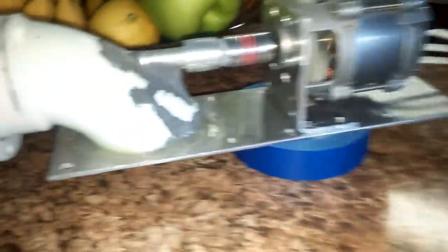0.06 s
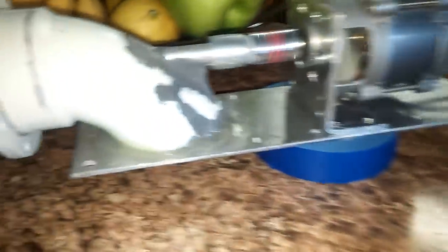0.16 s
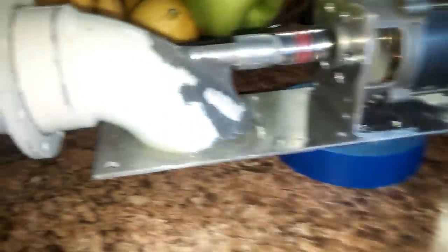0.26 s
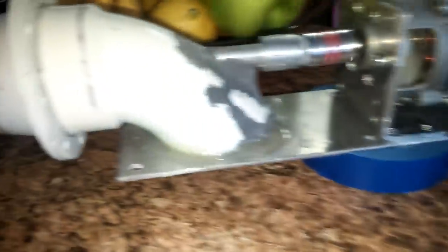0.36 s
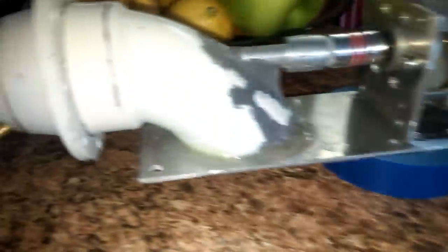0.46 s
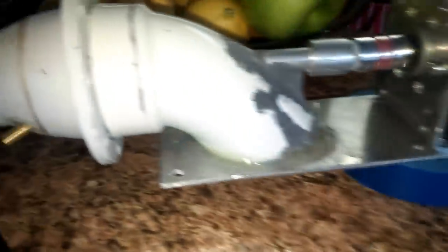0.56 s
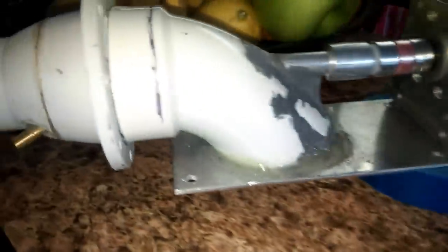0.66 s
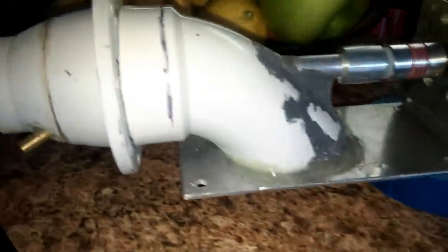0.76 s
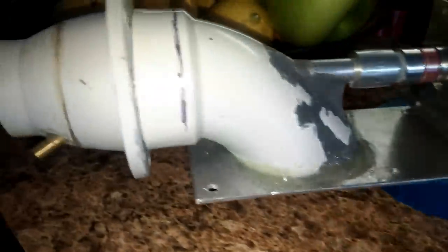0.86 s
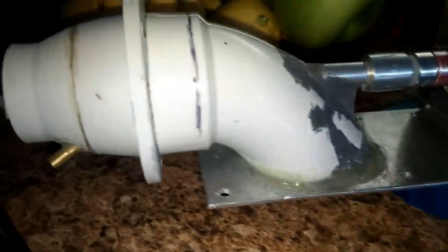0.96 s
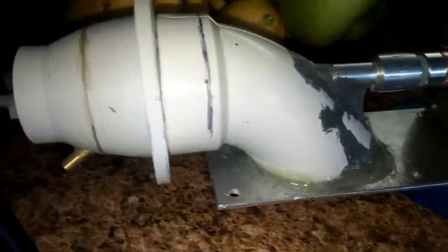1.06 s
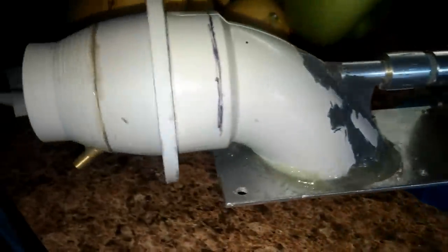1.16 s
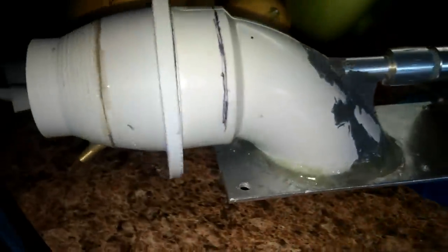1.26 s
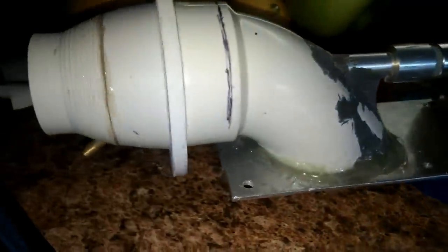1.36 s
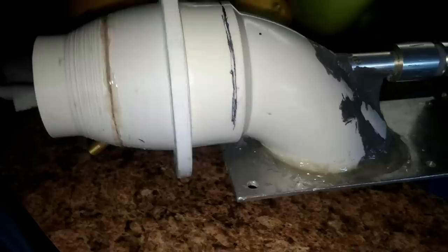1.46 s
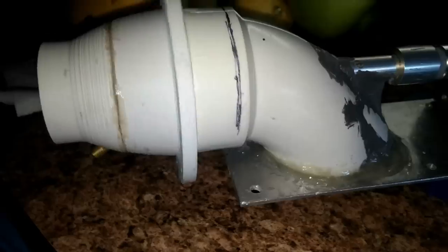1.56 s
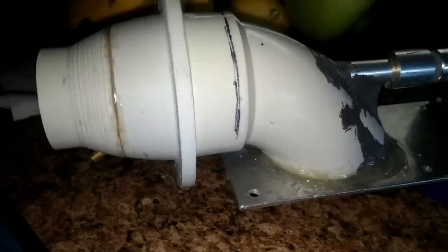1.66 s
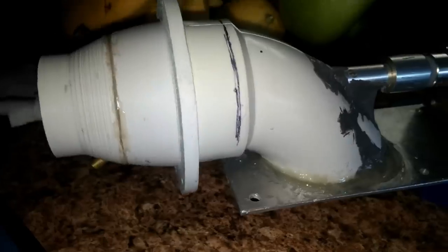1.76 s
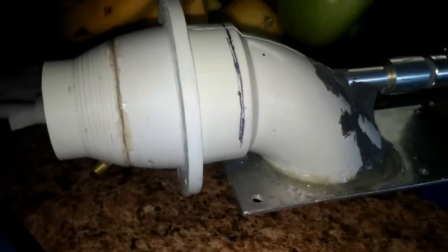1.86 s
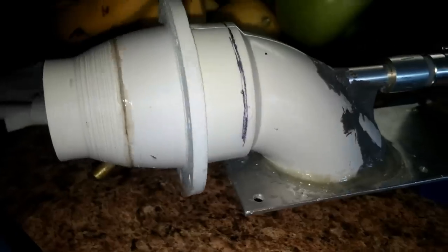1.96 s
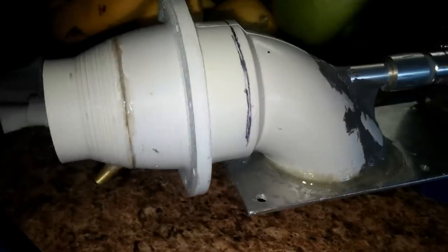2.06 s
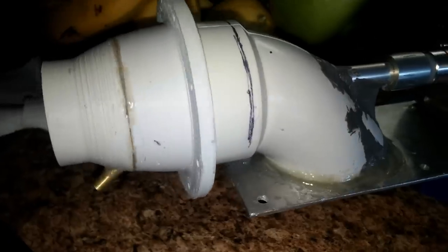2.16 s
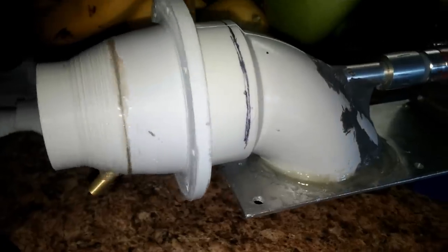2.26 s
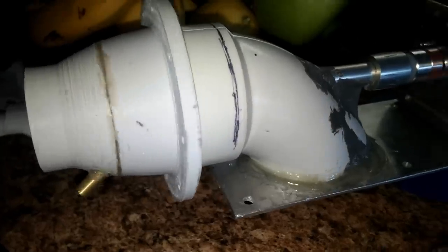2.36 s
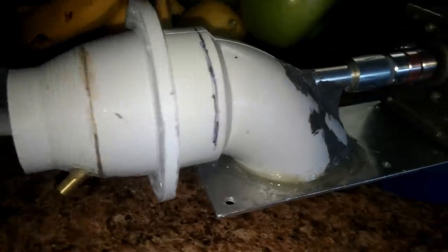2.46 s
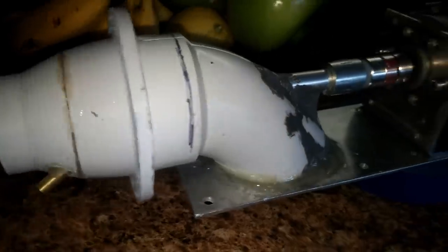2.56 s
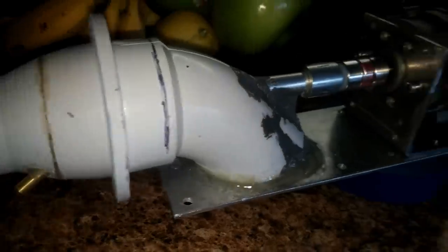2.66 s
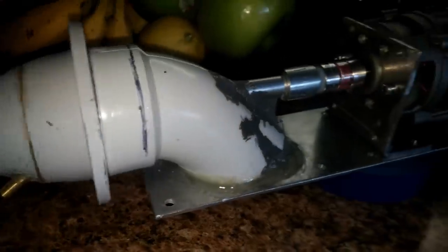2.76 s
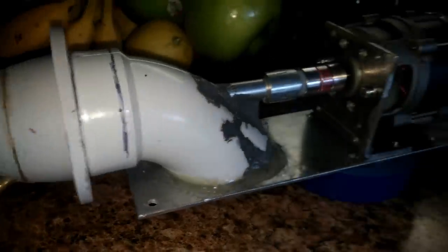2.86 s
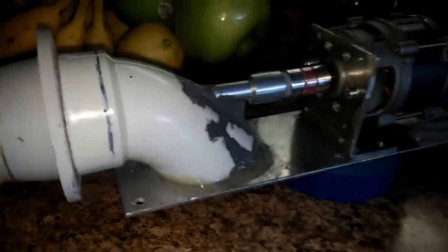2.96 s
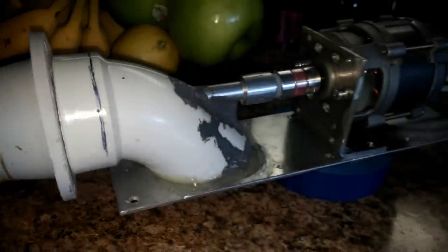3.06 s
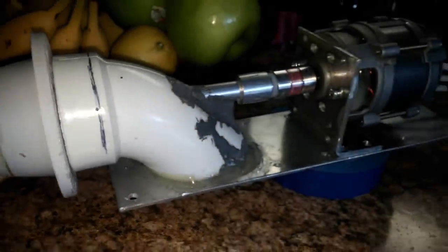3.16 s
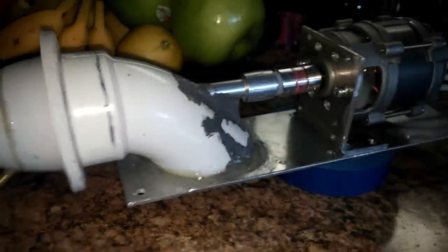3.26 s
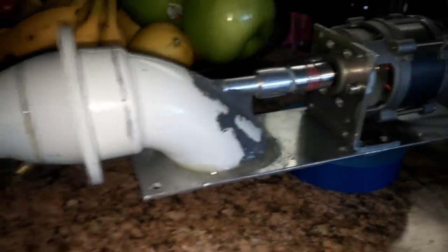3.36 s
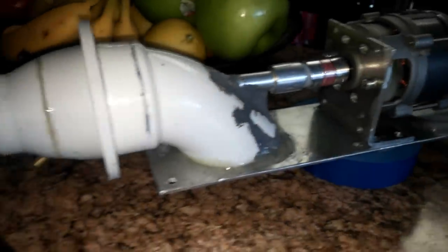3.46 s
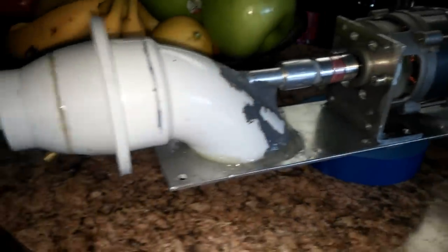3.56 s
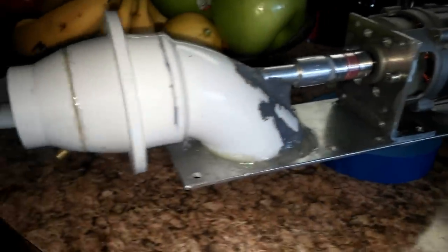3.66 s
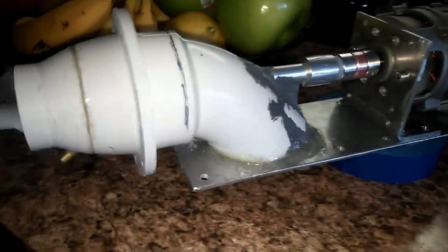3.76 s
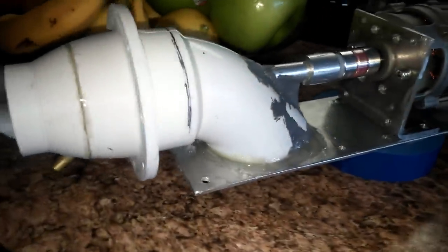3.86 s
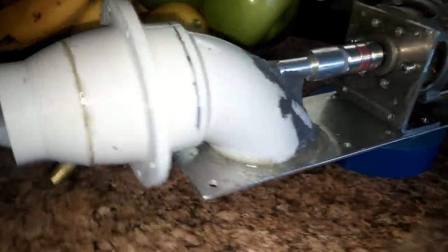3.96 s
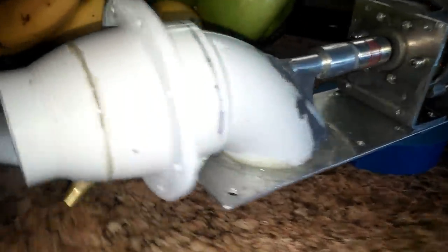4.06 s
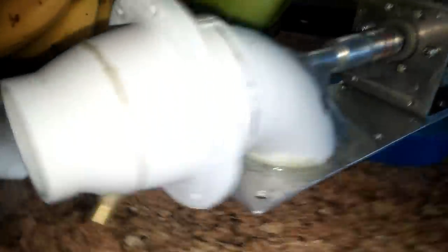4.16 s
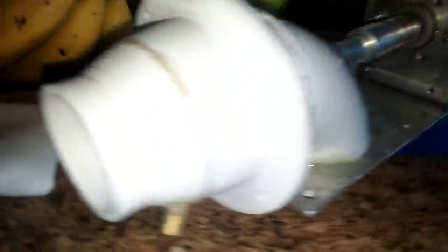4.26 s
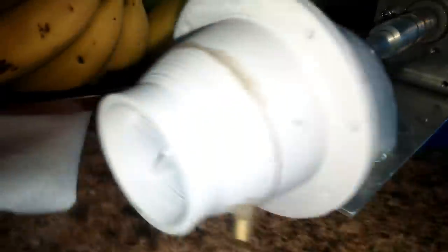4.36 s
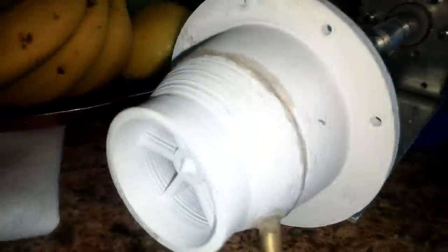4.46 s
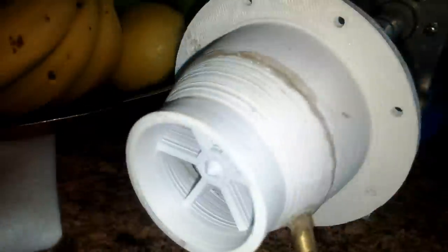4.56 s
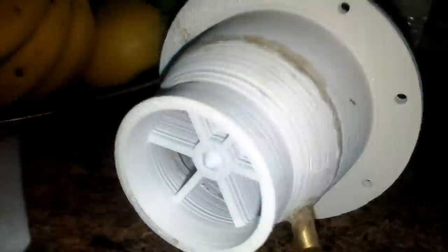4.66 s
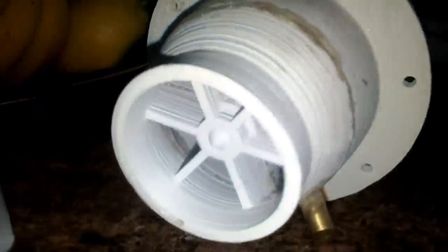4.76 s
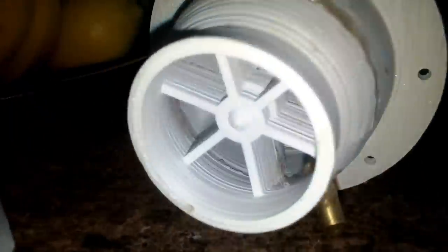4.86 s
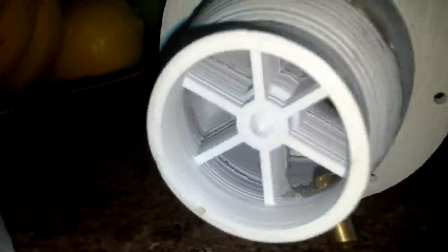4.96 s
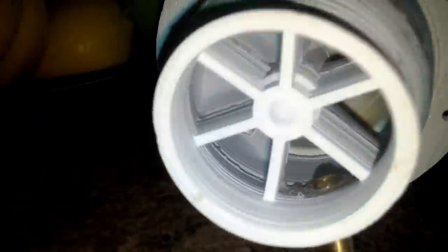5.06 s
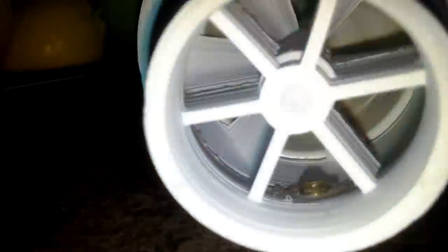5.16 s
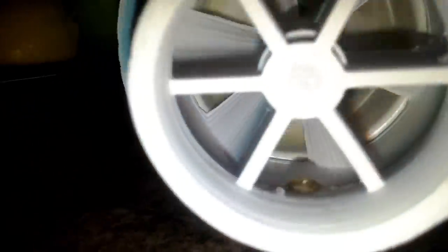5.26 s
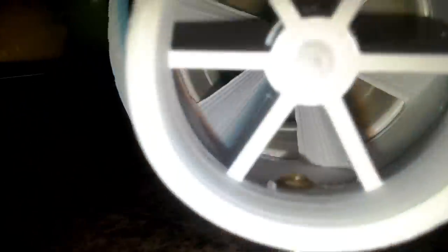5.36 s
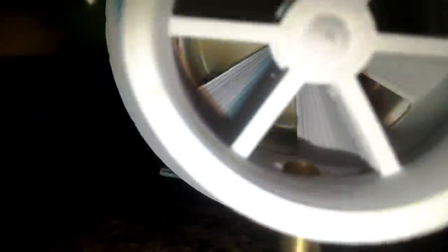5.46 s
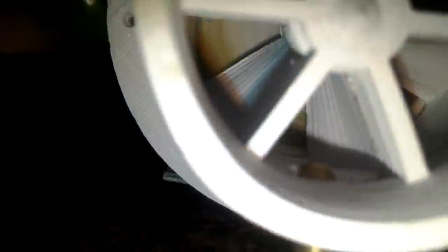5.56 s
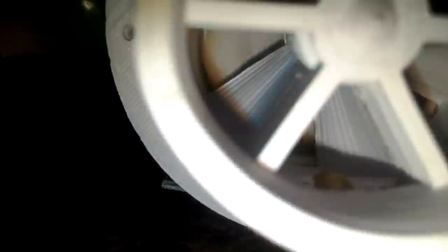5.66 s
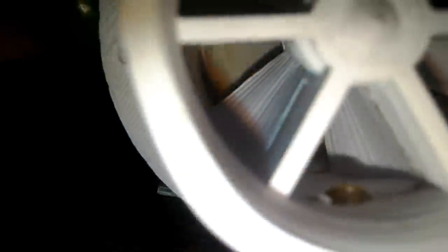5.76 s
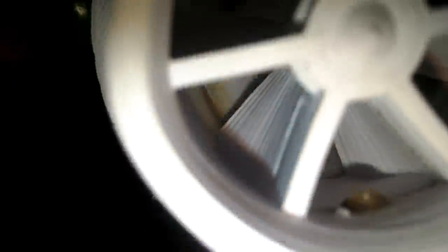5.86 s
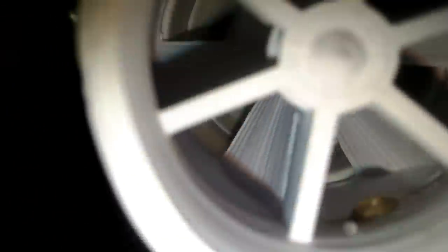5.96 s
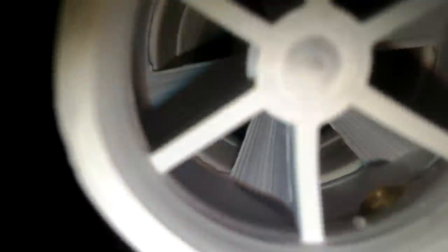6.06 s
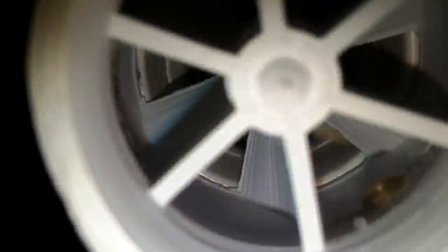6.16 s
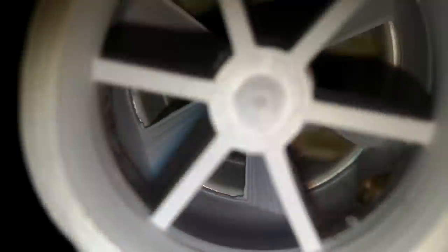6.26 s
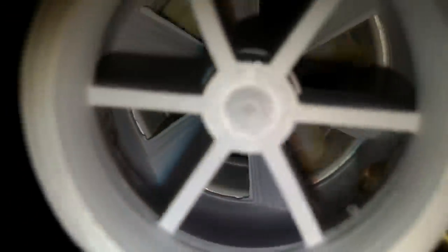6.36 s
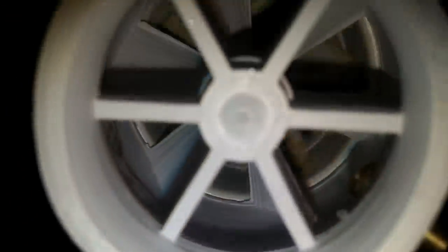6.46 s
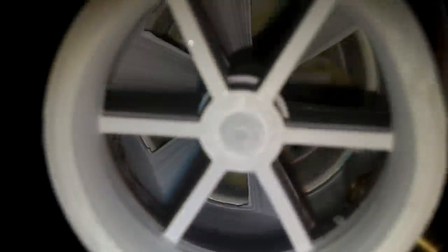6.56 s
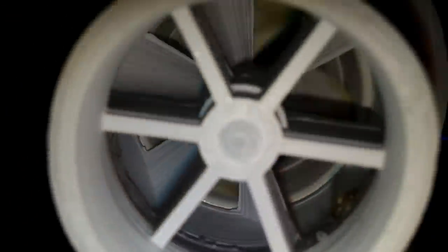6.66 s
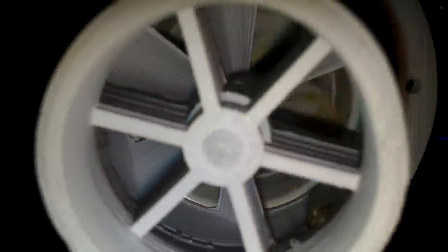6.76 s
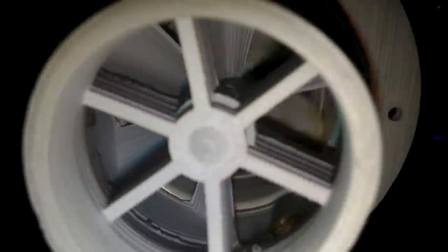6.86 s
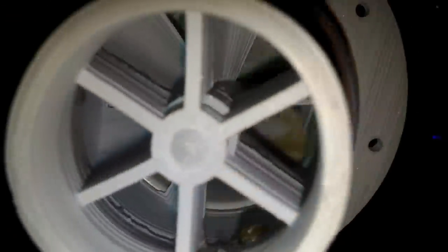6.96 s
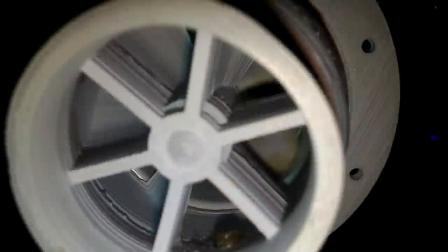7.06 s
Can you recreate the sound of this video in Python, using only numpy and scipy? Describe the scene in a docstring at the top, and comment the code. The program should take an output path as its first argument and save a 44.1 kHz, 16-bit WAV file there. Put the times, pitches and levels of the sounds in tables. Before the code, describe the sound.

An electric motor spins a plastic impeller dry inside a pipe housing on a kitchen counter. A blade scrapes the wall and the coupling knocks a metal base plate, making a fast, uneven, ringing rattle. Bearing hiss, a thin high whine and a low drone run behind it. Past halfway, the close hand-held microphone moves from the side to the open nozzle, and the scraping grows louder.

```python
"""A plastic impeller spins dry in its pipe housing on a kitchen counter, about 24 turns a second.
Once a turn a blade scrapes the wall and the coupling knocks the base plate, making both ring.
Behind this the bearings hiss, the seal rasps, the electric motor's drive whines near 8 kHz
and the counter drones. A hand-held stereo microphone moves from the side of the housing
round to the open nozzle."""
import sys
import numpy as np
from scipy.fft import rfft, irfft, next_fast_len
from scipy.io import wavfile
from scipy.ndimage import map_coordinates

SR = 44100
rng = np.random.default_rng(int(sys.argv[2]) if len(sys.argv) > 2 else 0)


def digitize_waveform(pressure):
    """Quantize a signal to 16-bit integers and store it at the path in sys.argv[1].

    Rows of a 2-D input are taken as channels; values are limited to [-1, 1].
    """
    field = np.atleast_2d(pressure).T
    bounded = np.clip(field, -1, 1)
    quanta = np.round(bounded * 32767).astype(np.int16)
    wavfile.write(sys.argv[1], SR, quanta)


N = 313531
SHAFT_HZ, SWITCH_HZ, MAINS_HZ = 23.92, 8000, 120
TIME = np.arange(N) / SR
TURNS = int(N / SR * SHAFT_HZ) + 1
FFT_SIZE = next_fast_len(N + SR // 8)
HZ = np.fft.rfftfreq(FFT_SIZE, 1 / SR)

# The microphone's path. Each row: time in seconds, the nozzle's share (0-1) of the rings, of the hiss.
NOZZLE_SHARE = [(0, 0.02, 0.033), (3.9, 0.13, 0.03), (4.3, 0.3, 0.093), (4.45, 0.7, 0.17),
                (4.53, 0.57, 0.5), (5, 0.73, 0.79), (5.4, 0.84, 0.83), (7.11, 0.82, 0.83)]
# The hand turning. Each row: time in seconds, left minus right in dB for the rings, for the hiss.
HAND_SWING = [(0, 2, 1.5), (1, 0, -1), (2, 0, 0.5), (3, -0.5, -0.5), (3.75, -0.5, -3.5), (4.3, 0, -0.5),
              (5, -.5, -1.5), (5.8, 0.5, 3.5), (7.11, -0.5, 4.5)]
# How the two channels differ at the side and at the nozzle. Each row: frequency in Hz,
# left minus right in dB, how far left leads in radians, how alike they are (0-1).
STEREO_SIDE = [(60, -2, 0.5, 1), (202, -7, -0.3, 0.99), (425, -3, -0.7, 0.9), (630, -9, -1.2, 1),
               (980, -6, 0.1, 1), (1605, -20.5, 2.5, 0.81), (2250, 0, 1.88, 0.87), (3860, 6.5, 1.6, 0.14),
               (5730, -10, 0.84, 0.07), (6820, -4.5, 0.5, 0), (9610, 0, -0.3, 0), (12000, -11.5, 1.3, 0),
               (14500, -14.5, 0.41, .05)]
STEREO_NOZZLE = [(60, 7, -0.49, 0.55), (200, 5.5, 0.85, 0.84), (500, 1.5, 0.89, 0.81), (780, 2.5, -0.53, 1),
                 (1100, -6, -1.6, 0.14), (1515, 1.5, -2.04, 0.93), (2120, -9.5, -0.55, 0.48),
                 (4100, 1, -1.1, 0.15), (7750, -7, -1, 0.03), (14570, 1, -0.21, .05)]

# Loudness of the mains hum, counter drone and seal rasp. Each row: time in seconds, level in dB.
MAINS_LEVELS = [(0, -66), (.7, -64), (2.5, -61), (4.4, -60.5), (5, -66), (7.11, -60)]
DRONE_LEVELS = [(0, -50.5), (.6, -52), (1.2, -50.5), (1.8, -49.5), (2.5, -50), (3.2, -49.5), (3.9, -50),
                (4.6, -50.5), (5.3, -49), (5.6, -51), (6, -49), (6.6, -51), (7.11, -50)]
RASP_LEVELS = [(0, -68), (.5, -51), (.9, -55), (1.2, -50), (1.45, -43.5), (1.75, -56), (2.0, -49),
               (2.15, -45), (2.5, -51), (2.9, -50), (3.3, -56), (4.0, -52.5), (4.45, -52.5), (4.53, -43),
               (4.75, -49), (5.0, -53), (5.4, -49.5), (6.1, -45), (6.6, -48), (7.11, -46)]
# Tone colours of the drone, hiss, sizzle and ticks. Each row: frequency in Hz, relative level in dB.
DRONE_COLOUR = [(24, -23), (42, 2), (60, 0), (85, -3.5), (102, -11), (130, -18), (150, -4.5), (210, -4.5),
                (260, -4.5), (340, -53), (570, -120)]
HISS_COLOUR_SIDE = [(1940, -46), (3300, -26), (3550, -11.5), (4090, -5.5), (4600, -14.5), (5050, -17.5),
                    (5750, -9.5), (6240, -9.5), (6850, -9), (7570, -1), (7800, -1.5), (8000, -2.5),
                    (10400, -7.5), (17600, -120)]
HISS_COLOUR_NOZZLE = [(1940, -33), (3300, 11), (3690, -38), (4020, 11), (4310, -3), (4550, 5), (4750, 0),
                      (5000, 8.5), (5420, 13.5), (5970, 7), (6430, 16), (7000, 9.5), (8000, 14.5),
                      (10400, -49), (17600, -120)]
SIZZLE_COLOUR_SIDE = [(4880, -30), (8300, -16), (8390, -21), (8460, -6), (10900, -7), (12300, -1),
                      (13400, -11.5), (15700, -13.5)]
SIZZLE_COLOUR_NOZZLE = [(4880, -38), (8300, -3), (8460, -5), (9260, -0.5), (9710, -9), (10100, -6),
                        (10350, -3), (10700, -9), (11600, -9), (12600, -17), (13200, -10), (13800, -20),
                        (14200, -9), (14900, -14), (15700, -6.5)]
TICK_COLOUR = [(6000, -36), (9000, 3), (12000, 4), (14000, -2), (16000, -15)]
# The counter's hum. Each row: multiple of the shaft speed, dB added to DRONE_LEVELS.
SHAFT_TONES = [(2, -10), (3, -11)]
# Dull thumps. Each row: start in seconds, level in dB, pitch in Hz, seconds to fade by 60 dB.
COUNTER_THUMPS = [(0.21, -39, 69, 0.15), (0.511, -37, 64.7, 0.13), (0.586, -38, 65, 0.18),
                  (0.747, -36, 59, 0.18), (1.312, -42, 82, 0.18), (1.958, -43, 70, 0.2),
                  (2.26, -35, 70, 0.2), (2.547, -44, 64, 0.17), (3.09, -45, 70, 0.17),
                  (3.254, -37, 64, 0.18), (3.631, -34, 75.4, 0.29), (3.679, -38, 75, 0.17),
                  (3.767, -36.5, 86, 0.21), (4.24, -31, 83, 0.33), (4.255, -34.5, 173, 0.12),
                  (4.579, -32, 178, 0.075), (5.195, -37, 58.2, 0.18), (5.308, -37, 58, 0.22),
                  (6.397, -38, 67, 0.17), (7.0, -36.5, 70.6, 0.2)]
# The two main whine tones. Each row: time in seconds, level in dB of the upper, of the lower.
WHINE_LEVELS = [(0, -52, -52), (0.08, -45, -53), (0.34, -45, -50), (0.48, -60, -53), (0.65, -45, -57),
                (0.9, -43, -59), (1.1, -39, -50), (1.3, -36, -53), (1.5, -38, -60), (1.75, -40, -47),
                (2, -44, -46), (2.15, -40, -47), (2.35, -39, -51), (2.6, -42, -62), (2.8, -41, -53),
                (2.95, -43, -64), (3.12, -50, -65), (3.3, -50, -65), (3.55, -44, -65), (3.75, -43, -64),
                (4, -48, -57), (4.15, -49, -65), (4.3, -49, -56), (4.5, -55, -48), (4.65, -47, -59),
                (4.85, -47, -63), (5.1, -41, -61), (5.25, -47, -51), (5.4, -50, -64), (5.6, -59, -60),
                (5.9, -64, -52), (6.15, -52, -57), (6.4, -49, -61), (6.6, -49, -56), (6.9, -45, -51),
                (7.1, -47, -52)]
# Weaker whine tones. Each row: steps of the shaft speed above SWITCH_HZ, level in dB.
FAINT_WHINES = [(0, -62), (8, -67)]
# Bearing noise. Each row: time in seconds, level in dB of the hiss, of the sizzle above it.
HISS_LEVELS = [(0.0, -46, -45), (0.93, -44, -43), (1.35, -41.5, -42), (2.55, -43, -42.5),
               (3.17, -46.5, -45.5), (3.9, -47, -46.5), (4.44, -44, -46), (4.53, -43.5, -44),
               (5.0, -43.5, -41.5), (5.64, -38.5, -38.5), (6.06, -40.5, -41.5), (6.46, -42.5, -40.5),
               (7.11, -42, -41.5)]
# Thin ticks. Each row: time in seconds, level in dB.
THIN_TICKS = [(1.228, -33), (1.326, -30), (1.617, -37), (1.807, -36), (2.262, -43), (2.406, -45),
              (2.5, -35), (3.078, -38), (3.245, -39), (3.539, -39), (3.625, -36), (4.491, -32),
              (4.795, -39), (5.354, -36), (5.506, -33), (7.085, -36)]

# The notes (modes) at which the seal, plate (two groups) and housing (four groups) ring.
# Each row: pitch in Hz, width in Hz, strength in dB from the side, at the nozzle.
SEAL_MODES = [(5620, 340, 3, 3), (5900, 250, -6, -4)]
PLATE_MODES = [
    [(236, 11.7, -1, -2), (290.7, 8.5, -9, 12), (344.8, 29, 3.5, -6), (452, 71, -3, -1)],
    [(560, 68, 3, -0.5), (648, 67, -2.5, 3.5), (735, 117, -6.5, 5), (850, 200, -12.5, -12)],
]
HOUSING_MODES = [
    [(918, 40, -7, 3.5), (1012.7, 19.4, 4.5, 1), (1181, 92, 0.5, -10.5), (1257.4, 41, 3, 0),
     (1345, 26, -52, 15)],
    [(1463, 55, 5.5, 4), (1636, 53, -1.5, 0), (1720, 35, -3, -5), (1822, 56, 0, -9.5)],
    [(2047, 60, 3.5, -7), (2201, 26, 2, -0.5), (2253, 36, -0.5, 1.5), (2516, 133, -25.5, -7)],
    [(2784, 155, 0.5, -3), (2972, 65, 2, 8), (3082, 32, -1, 6.5), (3250, 124, -6, -0.5)],
]
# Regular knocking. Each row: time in seconds, level in dB of the plate's low rings, of its high rings.
PLATE_LEVELS = [(0, -47, -41.5), (0.4, -44.5, -41.5), (1.8, -47, -42), (2.5, -45, -39), (3.1, -46.5, -42.5),
                (3.9, -47, -46.5), (4.7, -49.5, -41.5), (5.5, -51.5, -37), (5.95, -50.5, -39),
                (6.33, -42, -38.5), (6.7, -48, -40.5), (7.11, -48, -37.5)]
# The hardest knocks. Each row: time in seconds, level in dB and pitch in Hz of the high rings,
# extra dB and pitch in Hz of the low rings.
HARD_KNOCKS = [(0.071, -34, 563, -18, 448), (0.1525, -29, 530, -7, 450), (0.1892, -32, 558, -27.0, 447),
               (0.31, -34.8, 600, -28, 370), (0.3728, -36.5, 577, -7, 355), (0.483, -33.6, 530, -10, 423),
               (0.5323, -31.5, 559, -18.6, 397), (0.7466, -36, 540, -4, 392), (0.7761, -33, 550, -18, 461),
               (0.9501, -39, 604, -19, 410), (1.0286, -30.2, 534, -8, 444), (1.112, -33.5, 570, -29, 374),
               (1.3229, -37.1, 536, -10, 445), (1.3597, -36, 566, -9, 411), (1.409, -33.5, 570, -33, 400),
               (1.62, -34, 530, -7, 395), (1.6569, -35, 610, -14, 410), (1.7383, -31, 590, -23, 388),
               (1.8247, -35.5, 554, -14.2, 430), (1.9102, -38, 537, -4.5, 415),
               (2.0777, -38, 566, -10, 407), (2.2076, -35, 576, -12.1, 386), (2.3318, -33, 554, -24, 445),
               (2.3696, -31, 560, -13.2, 419), (2.4109, -28, 540, -7.0, 433), (2.4587, -35.8, 607, 0, 419),
               (2.8307, -37, 566, -6.5, 420), (2.9525, -35, 548, -6, 423), (3.0355, -36, 568, -4, 449),
               (3.079, -36.5, 534, 0, 423), (3.2439, -36.5, 564, -17, 443), (3.2985, -33.5, 556, -17, 370),
               (3.4076, -40, 572, -9, 410), (3.5812, -39.5, 585, -10, 427), (3.7468, -33.5, 563, -5.1, 383),
               (3.7855, -35.8, 620, -14.2, 378), (3.8304, -43, 540, -2.3, 384),
               (3.9512, -33, 564, -17, 410), (3.998, -40, 544, -26, 423), (4.2513, -41.5, 590, -7, 414),
               (4.294, -41, 600, -6, 404), (4.3716, -37.5, 558, -13, 456), (4.5957, -46, 573, -2, 370),
               (4.6116, -35, 606, -7, 370), (4.6648, -34, 576, -8, 380), (4.831, -36, 553, -9, 415),
               (5.0037, -37.5, 560, -22.0, 435), (5.0815, -37, 530, -7, 418), (5.4226, -35, 580, -15, 391),
               (5.4589, -29, 579, -34.0, 440), (5.7498, -31, 577, -16, 425), (5.9494, -32, 645, -27, 416),
               (6.006, -32, 570, -29.6, 462), (6.0938, -32, 576, -19.1, 374),
               (6.2516, -32.3, 567, -11, 351), (6.3339, -29, 590, -19, 368), (6.389, -31, 590, -17.7, 362),
               (6.4223, -32, 536, -11.2, 355), (6.5097, -34.5, 532, -4.5, 420),
               (6.9655, -35.7, 552, -13.4, 382), (7.0076, -37, 570, -22.0, 336),
               (7.0913, -30.5, 556, -24.3, 408)]
# Regular scraping. Each row: time in seconds, levels in dB of the housing's low, main and high rings.
HOUSING_LEVELS = [(0, -45, -37, -44), (0.42, -37.5, -37, -43.5), (0.95, -40.5, -35, -41),
                  (1.5, -33.5, -32.5, -35.5), (2, -36, -35.5, -38.5), (2.6, -35, -36.5, -36),
                  (3.3, -36.5, -36, -40.5), (3.9, -38, -42, -36.5), (4.2, -37.5, -40.5, -37.5),
                  (4.5, -37, -35.5, -33), (4.7, -39, -32.5, -30), (4.9, -37, -29.5, -33.5),
                  (5.4, -36, -25, -28), (6.24, -33, -28, -30.5), (7.11, -39.5, -28.5, -31)]
# The housing's topmost rings. Each row: time in seconds, level in dB.
TOP_RING_LEVELS = [(0.0, -61), (0.73, -57.5), (1.46, -49.5), (2.39, -46), (2.99, -55), (3.32, -56),
                   (5.11, -46.5), (5.56, -37.5), (6.08, -41), (7.11, -40.5)]
# The hardest scrapes. Each row: time in seconds, level in dB and pitch in Hz of the main rings,
# extra dB of the low rings, extra dB and pitch in Hz of the high rings.
HARD_SCRAPES = [(0.0571, -33.5, 1520, -21, -4, 2120), (0.1391, -36, 1500, -23, -13, 2130),
                (0.1793, -33, 1560, -7, -22.8, 2108), (0.265, -29, 1506, -11, -15, 2120),
                (0.3472, -34, 1510, -19, -11, 2110), (0.391, -29, 1570, -5, -8.1, 2112),
                (0.43, -29.5, 1540, -4.2, -7, 2030), (0.5637, -42.5, 1495, 7, -1, 2051),
                (0.5977, -37, 1602, 1.6, -2, 2066), (0.642, -27, 1470, -19, -17, 2041),
                (0.6703, -29, 1500, -10.6, -21, 2157), (0.7655, -28, 1530, -14, -24.8, 2100),
                (0.807, -26, 1535, -17, -18, 2060), (0.8494, -30, 1544, -25, -11, 2240),
                (0.8893, -20.5, 1482, -2, -19, 2150), (0.9353, -33, 1527, -2, -6, 2083),
                (0.9755, -31.9, 1505, 0, -8, 2159), (1.0176, -37, 1500, 9.5, -1.4, 2102),
                (1.1004, -30, 1470, -18, -20, 2110), (1.1504, -34, 1490, -15, -1, 2270),
                (1.1859, -26.8, 1520, -22.2, -5.4, 2140), (1.229, -26, 1484, -11, -28, 2157),
                (1.3097, -25.6, 1520, 1, -12.6, 2090), (1.3521, -21, 1570, -5, -9.1, 2060),
                (1.4449, -29.5, 1560, -12, 0, 2160), (1.48, -28, 1548, -14, -1, 2250),
                (1.5177, -22.5, 1470, -10, -18.7, 2174), (1.562, -20, 1510, -26, -8, 2150),
                (1.65, -29, 1440, -1, -4, 2200), (1.7304, -24.3, 1474, -22.6, -12, 2060),
                (1.7697, -23, 1490, -11, -17, 2099), (1.8934, -25, 1490, -0.7, -3.5, 2136),
                (1.937, -34, 1506, 3.8, -6, 2181), (1.978, -30, 1491, -21.3, -10.0, 2030),
                (2.0153, -32, 1510, 2.8, 2.5, 2224), (2.0634, -37.5, 1530, 2, 6, 2080),
                (2.1056, -36, 1477, 3, -8, 2110), (2.1479, -27.5, 1500, -15.2, -10, 2100),
                (2.1903, -30.5, 1520, -12, -1.8, 2150), (2.2295, -27.5, 1510, -16, -12.6, 2100),
                (2.272, -30.5, 1546, -8, -13, 2057), (2.313, -33.5, 1560, 5.5, -4, 2120),
                (2.4405, -25, 1530, -3, -2, 2050), (2.4851, -32.5, 1470, -10, 7, 2124),
                (2.5177, -26.5, 1521, -4.3, -19, 2120), (2.5694, -37.5, 1539, 7.1, 9.5, 2150),
                (2.6092, -35, 1520, -6, 2.5, 2080), (2.7313, -30.4, 1520, -15, -5, 2092),
                (2.8585, -29.5, 1460, -5, -4, 2160), (2.983, -31, 1520, -5, -3, 2124),
                (3.1086, -35, 1507, -20, 1.5, 2040), (3.152, -33.5, 1470, -1, 0, 2200),
                (3.187, -34, 1530, -15, -6, 2080), (3.3559, -33, 1550, 6, -2.9, 2091),
                (3.3932, -32, 1505, -3.3, -10.7, 2086), (3.6078, -39, 1470, -1, -6, 2050),
                (3.6918, -36, 1500, -4, -2.9, 2090), (3.7359, -42, 1538, 16, 8, 2130),
                (3.7795, -40, 1540, 0, 3, 2150), (3.8994, -31.9, 1490, -7, -9, 2110),
                (3.983, -36.5, 1470, -4, 9.5, 2159), (4.0265, -33, 1530, -8, 1.6, 2139),
                (4.0682, -43, 1520, -13, 8, 2053), (4.1057, -36, 1510, 9, 4.5, 2050),
                (4.2353, -45, 1496, 8, 14, 2030), (4.2742, -28.5, 1478, -20.9, -3, 2110),
                (4.317, -33.5, 1460, -13, 11, 2100), (4.3579, -49, 1440, -3, 15, 2130),
                (4.4409, -32.7, 1490, -15, 6, 2180), (4.6072, -44, 1480, 9, 8, 2270),
                (4.6482, -45, 1506, -7.2, 17, 2210), (4.6865, -46, 1453, 4, 16, 2242),
                (4.7727, -27.5, 1504, -8.5, 2, 2216), (4.8644, -23.5, 1487, -8, -5, 2160),
                (4.905, -28.5, 1540, -6.3, -7, 2260), (4.9824, -27, 1460, -24.9, -10, 2230),
                (5.0318, -21.5, 1440, -5.2, -13, 2200), (5.0748, -21.5, 1460, -10, -15, 2290),
                (5.1151, -22, 1570, -15.2, -21, 2170), (5.2398, -21.5, 1600, -15, -17, 2150),
                (5.2822, -19.5, 1550, -18, -20.2, 2250), (5.3269, -20, 1580, -19.9, -3.9, 2165),
                (5.4033, -25.5, 1454, -23.2, 6.5, 2222), (5.4497, -22, 1524, -13.7, -8, 2157),
                (5.4913, -18, 1510, -7, -13, 2180), (5.616, -21, 1520, -5.7, -6, 2147),
                (5.6578, -16, 1530, -21, -10, 2190), (5.7402, -24.5, 1560, -11, 2, 2140),
                (5.8248, -21, 1550, -7, -10, 2100), (5.8662, -23, 1550, -9, -10.3, 2100),
                (5.9475, -26.8, 1520, -6.5, -1, 2110), (5.9893, -21.5, 1570, -17, -22, 2116),
                (6.0321, -23, 1495, -9.0, -2, 2160), (6.1226, -22.5, 1460, -18, -11, 2284),
                (6.204, -24, 1470, -22, -10.9, 2150), (6.3709, -24.5, 1510, -17, -5, 2218),
                (6.4096, -25, 1478, -17, -2.3, 2240), (6.4493, -24, 1478, -3, -17, 2100),
                (6.4947, -24, 1510, -17, -7.2, 2100), (6.5377, -23.5, 1470, -11, -11, 2107),
                (6.7068, -24.5, 1430, -7, -4, 2229), (6.7466, -28, 1456, -13, -2, 2270),
                (6.7919, -23, 1550, -22, -5, 2210), (6.873, -15, 1585, -10, -18, 2240),
                (6.9095, -23.2, 1500, -30, -14, 2230), (6.9969, -25.0, 1510, -14.5, -2, 2180),
                (7.0384, -21, 1500, -16.0, -22, 2211), (7.083, -22.1, 1600, -15, -8, 2270)]


def amp(db):
    """Turn decibels into a gain."""
    return 10 ** (np.asarray(db) / 20)


def over_frequency(rows):
    """Spread each column after the first over HZ, on a log scale."""
    hz, *columns = np.transpose(rows)
    return np.squeeze([np.interp(np.log(HZ + 1), np.log(hz + 1), column) for column in columns])


def over_time(rows):
    """Spread each column after the first over all samples."""
    times, *columns = np.transpose(rows)
    return [np.interp(TIME, times, column) for column in columns]


def wobble(rate):
    """A smooth random curve with `rate` new values a second."""
    return map_coordinates(rng.standard_normal(int(N * rate / SR) + 4), [TIME * rate])


def colours(side, nozzle):
    """Turn two tone colour tables into filters."""
    return amp(over_frequency(side)), amp(over_frequency(nozzle))


def resonances(modes):
    """Side and nozzle filters for a group of modes; the thick walls pass little outside them."""
    low_hz, high_hz = 0.5 * modes[0][0], 2.1 * modes[-1][0]
    walls = 1 / (1 + (HZ / high_hz) ** 4) / (1 + (low_hz / (HZ + 1)) ** 4)
    filters = 0
    for k, (hz, width, *strengths_db) in enumerate(modes):
        peak = 1j * HZ * width / (hz ** 2 - HZ ** 2 + 1j * HZ * width)
        filters = filters + (-1) ** k * np.outer(amp(strengths_db), peak)
    return filters * walls


def stereo_filters(table):
    """Left and right filters for the sound the channels share and for the part that differs."""
    pan_db, lead, alike = over_frequency(table)
    spread = np.arccos(np.clip(alike, 0, 1)) / 2
    tilt = amp(pan_db / 2) * np.exp(0.5j * lead)
    return np.cos(spread) * np.array([tilt, 1 / tilt]), np.sin(spread) * np.array([tilt, -1 / tilt])


def noise_at(mic, envelope, filters, chatter=0):
    """Noise that follows an envelope, plus any chatter, blended between side and nozzle."""
    force = envelope * rng.standard_normal((2, N)) + chatter
    shared, differing = rfft(force, FFT_SIZE)
    blend = 0
    for colour, (same, apart), gain in zip(filters, *mic):
        stereo = irfft(colour * (shared * same + differing * apart), FFT_SIZE)[:, :N]
        blend = blend + gain * stereo / np.std(stereo.mean(axis=0))
    return np.std(force) * blend


def bursts(times, levels_db, width_s, hz=None):
    """Rounded bumps that peak at the given times; with pitches they become short chatters."""
    offsets = np.arange(-SR // 30, SR // 30)
    spots = (times * SR).astype(int)[:, None] + offsets + SR
    widths = np.where(offsets < 0, 1.53 * width_s, width_s)  # builds up slower than it lets go
    shapes = np.outer(amp(levels_db), np.exp(-0.5 * (offsets / SR / widths) ** 2))
    if hz is not None:
        shapes = shapes * np.cos(2 * np.pi * np.outer(hz, offsets) / SR)
    return np.bincount(spots.ravel(), shapes.ravel(), N + 2 * SR)[SR:SR + N]


def each_turn(angle, db, scatter_db, width_s, jitter_s, hard_times=(-1,)):
    """One uneven contact a turn, at `angle` (0-1), over steady rubbing; it makes way for hard ones."""
    timing, strength = np.clip(rng.standard_normal((TURNS, 2)), -2, 1.6).T
    times = (np.arange(TURNS) + angle) / SHAFT_HZ + jitter_s * timing
    near_hard = np.abs(times[:, None] - np.asarray(hard_times)).min(axis=1) < 0.3 / SHAFT_HZ
    contact = 4.5 + bursts(times, db + scatter_db * strength - 20 * near_hard, width_s)
    return contact / np.sqrt(np.mean(contact ** 2))


def rings(mic, modes, contact, level_db, times, hard_db, hz, width_s, chatter_db, turn_db):
    """Regular and hard contacts make a group of modes ring; each chatters at a pitch of its own."""
    envelope = amp(level_db) * contact + bursts(times, hard_db - 7.5, width_s)
    hard_chatter = bursts(times, hard_db + chatter_db, width_s, hz)
    pitch = np.median(hz) * (1 + 0.025 * wobble(SHAFT_HZ))
    tone = np.cos(2 * np.pi * np.cumsum(pitch) / SR)
    turn_chatter = amp(level_db + turn_db) * (contact - contact.min()) * tone
    return noise_at(mic, envelope, resonances(modes), hard_chatter + turn_chatter)


def mains_hum():
    """The mains supply hums faintly on one low note."""
    return np.sqrt(2) * amp(over_time(MAINS_LEVELS)[0]) * np.sin(2 * np.pi * MAINS_HZ * TIME)


def thumps():
    """Dull thumps pass through the counter, each a low note that dies quickly."""
    track, t = np.zeros(N + SR), np.arange(SR // 2) / SR
    attack = 1 - np.exp(-t / 0.0025)
    for start, db, hz, fade_s in COUNTER_THUMPS:
        thump = amp(db - 60 * t / fade_s) * attack * np.sin(2 * np.pi * hz * t)
        track[round(start * SR):][:len(t)] += thump
    return track[:N]


def counter_drone(mic):
    """The unbalanced shaft shakes the counter into a throbbing rumble and a low hum."""
    level_db = over_time(DRONE_LEVELS)[0]
    throb = each_turn(0.54, db=7, scatter_db=7, width_s=0.0095, jitter_s=0.0024)
    envelope = amp(level_db - 2 - 0.1 * wobble(3.83)) * throb
    drone = noise_at(mic, envelope, colours(DRONE_COLOUR, DRONE_COLOUR))
    for multiple, db in SHAFT_TONES:
        gain = amp(level_db + db + 2.6 * wobble(4.94))
        drone += gain * np.sin(2 * np.pi * multiple * SHAFT_HZ * TIME + 0.52 * wobble(3.3))
    return drone


def drive_whine():
    """The drive's switching makes tones spaced by the shaft speed; they fade as the microphone moves."""
    drift = 0.5 * np.array([wobble(4.84), wobble(2.88)])

    def tone(steps, db):
        hz = SWITCH_HZ + steps * SHAFT_HZ
        return np.sqrt(2) * amp(db) * np.sin(2 * np.pi * hz * TIME + drift)

    upper_db, lower_db = over_time(WHINE_LEVELS)
    upper = tone(4, upper_db + np.array([[-7], [4]]))  # both are louder on the right
    lower = tone(-4, lower_db + np.array([[-2], [1]]))
    return upper + lower + sum(tone(steps, db + 4 * wobble(3.17)) for steps, db in FAINT_WHINES)


def bearing_hiss(mic):
    """Bearings and seal hiss finely, with a flickering sizzle on top and now and then a thin tick."""
    hiss_db, sizzle_db = over_time(HISS_LEVELS)
    hiss = noise_at(mic, amp(hiss_db + 1.07 * wobble(21)), colours(HISS_COLOUR_SIDE, HISS_COLOUR_NOZZLE))
    times, tick_db = np.transpose(THIN_TICKS)
    ticks = noise_at(mic, bursts(times, tick_db, width_s=0.001), colours(TICK_COLOUR, TICK_COLOUR))
    flicker = amp(sizzle_db + 0.79 * wobble(8.8) + 1.44 * wobble(190))
    sizzle = noise_at(mic, flicker, colours(SIZZLE_COLOUR_SIDE, SIZZLE_COLOUR_NOZZLE))
    return hiss + ticks + sizzle


def seal_rasp(mic):
    """The seal rasps, swelling twice a turn."""
    swell = np.cos(4 * np.pi * (SHAFT_HZ * TIME - 0.3) + 0.88 * wobble(2.96))
    level_db = over_time(RASP_LEVELS)[0] + 3.5 * (swell - 1) + 2.3 * wobble(30)
    return noise_at(mic, amp(level_db), resonances(SEAL_MODES))


def plate_knocks(mic):
    """The coupling runs off-centre and knocks the base plate once a turn, after the scrape."""
    low_db, high_db = over_time(PLATE_LEVELS)
    times, db, high_hz, low_extra, low_hz = np.transpose(HARD_KNOCKS)
    nozzle = np.interp(np.arange(TURNS) / SHAFT_HZ, *np.transpose(NOZZLE_SHARE)[:2])
    knock_db = 8.5 - 3 * nozzle  # softer at the nozzle
    low_knock = each_turn(0.69, db=3, scatter_db=10, width_s=0.0044, jitter_s=0.0037, hard_times=times)
    knock = each_turn(0.52, knock_db, scatter_db=5, width_s=0.0022, jitter_s=0.00062, hard_times=times)
    low = rings(mic, PLATE_MODES[0], low_knock, low_db, times + 0.00323, db + low_extra, low_hz,
                width_s=0.0056, chatter_db=-13.5, turn_db=-18)
    high = rings(mic, PLATE_MODES[1], knock, high_db, times - 0.003, db, high_hz,
                 width_s=0.0042, chatter_db=-16, turn_db=-22)
    return low + high


def blade_scrapes(mic):
    """Blade tips rub the wall all round, hardest at one tight spot, and the housing rings."""
    low_db, main_db, high_db = over_time(HOUSING_LEVELS)
    times, db, main_hz, low_extra, high_extra, high_hz = np.transpose(HARD_SCRAPES)
    low_hz = np.full(len(times), 1265)
    force_db = 4.5 * np.clip(rng.standard_normal(TURNS), -2, 1.1)  # how hard each turn meets the spot
    low_rub = each_turn(0.26, force_db - 2.5, scatter_db=11,
                        width_s=0.0021, jitter_s=0.0043, hard_times=times)
    main_rub = each_turn(0.31, force_db + 11, scatter_db=2,
                         width_s=0.002, jitter_s=0.0009, hard_times=times)
    high_rub = each_turn(0.25, force_db + 4, scatter_db=3,
                         width_s=0.003, jitter_s=0.002, hard_times=times)
    low = rings(mic, HOUSING_MODES[0], low_rub, low_db, times - 0.0021, db + low_extra, low_hz,
                width_s=0.0047, chatter_db=-16.5, turn_db=-15)
    main = rings(mic, HOUSING_MODES[1], main_rub, main_db, times - 0.0023, db, main_hz,
                 width_s=0.0025, chatter_db=-14, turn_db=-20)
    high = rings(mic, HOUSING_MODES[2], high_rub, high_db, times - 0.0025, db + high_extra, high_hz,
                 width_s=0.0035, chatter_db=-13, turn_db=-31)
    top_rub = amp(over_time(TOP_RING_LEVELS)[0]) * high_rub ** 0.8
    return low + main + high + noise_at(mic, top_rub, resonances(HOUSING_MODES[3]))


def scene():
    """Mix all the sources as the microphone moves from the side to the nozzle."""
    views = stereo_filters(STEREO_SIDE), stereo_filters(STEREO_NOZZLE)
    shares = np.clip(over_time(NOZZLE_SHARE), 0, 1)
    # A mic holds the stereo filters of both places and the gain of each over time.
    mic, hiss_mic = [(views, np.sqrt([1 - share, share])) for share in shares]
    ring_pan, hiss_pan = [amp(np.outer([0.5, -0.5], db)) for db in over_time(HAND_SWING)]
    ringing = ring_pan * (blade_scrapes(mic) + plate_knocks(mic))
    hissing = hiss_pan * (bearing_hiss(hiss_mic) + seal_rasp(hiss_mic))
    return ringing + hissing + drive_whine() + counter_drone(mic) + thumps() + mains_hum()


def record(dry):
    """The microphone cuts the deepest bass and the highest treble."""
    bass_hz, top_hz = 38, 15760
    passed = (HZ < top_hz) / (1 + (bass_hz / (HZ + 1)) ** 6)
    return irfft(rfft(dry, FFT_SIZE) * passed, FFT_SIZE)[:, :N]


dry = scene()
out = record(dry)
digitize_waveform(out)
```